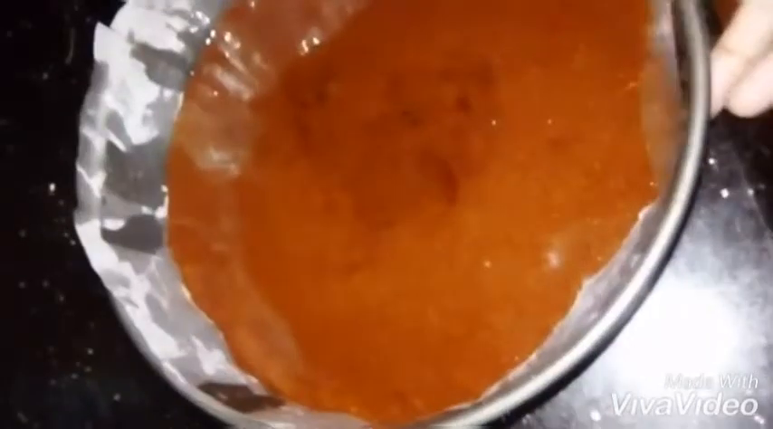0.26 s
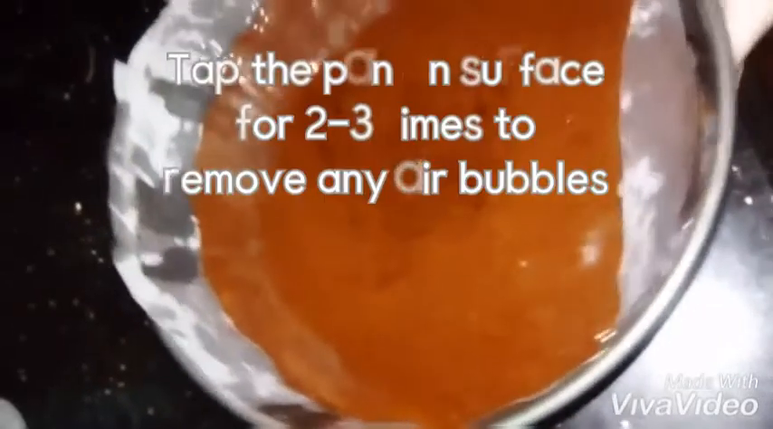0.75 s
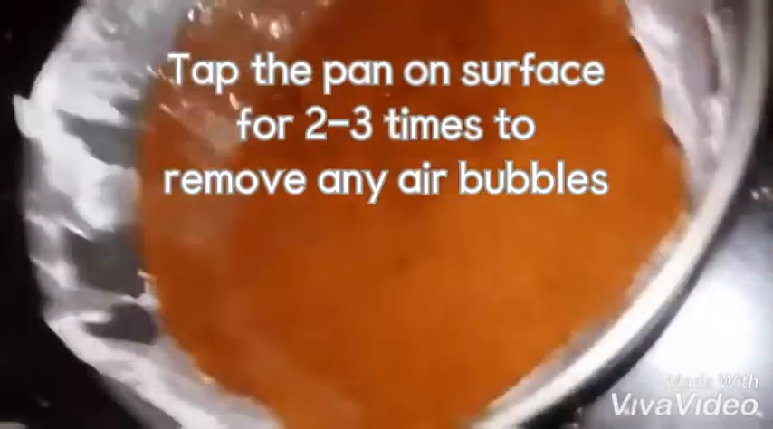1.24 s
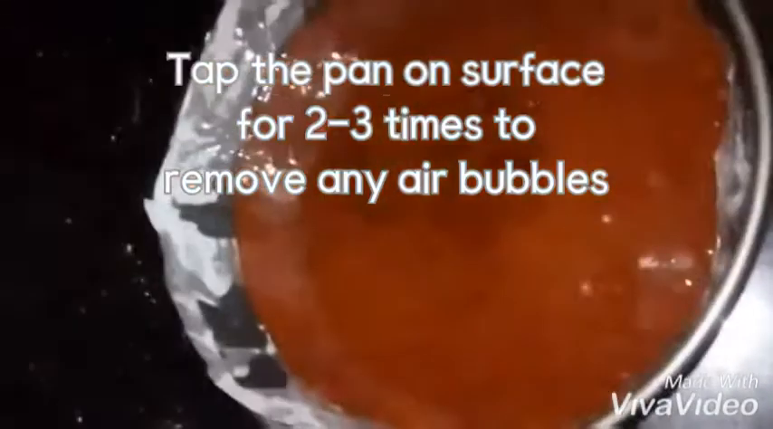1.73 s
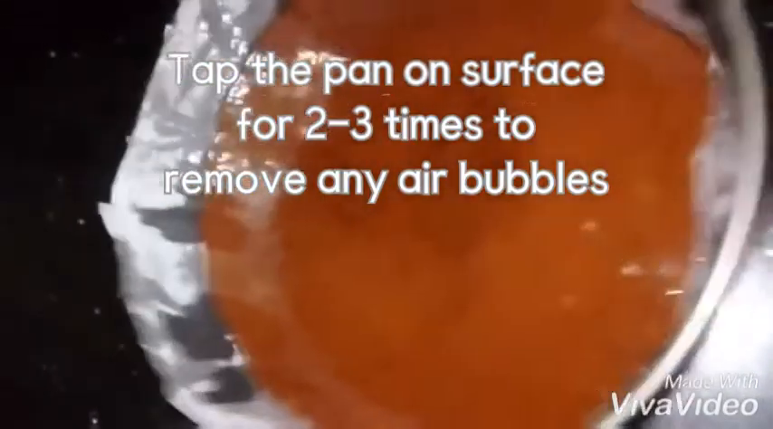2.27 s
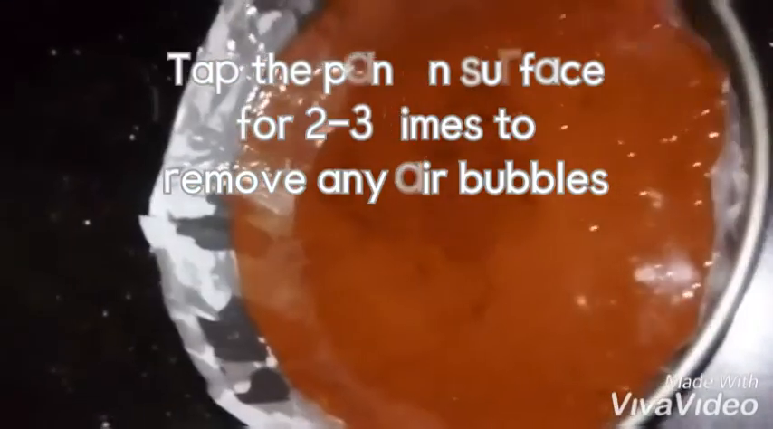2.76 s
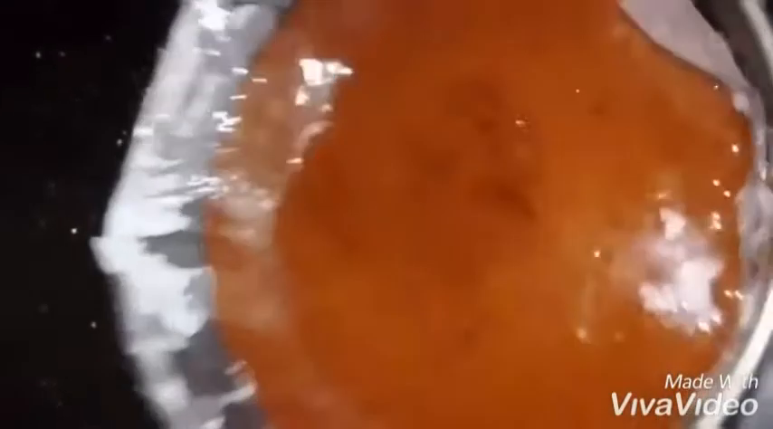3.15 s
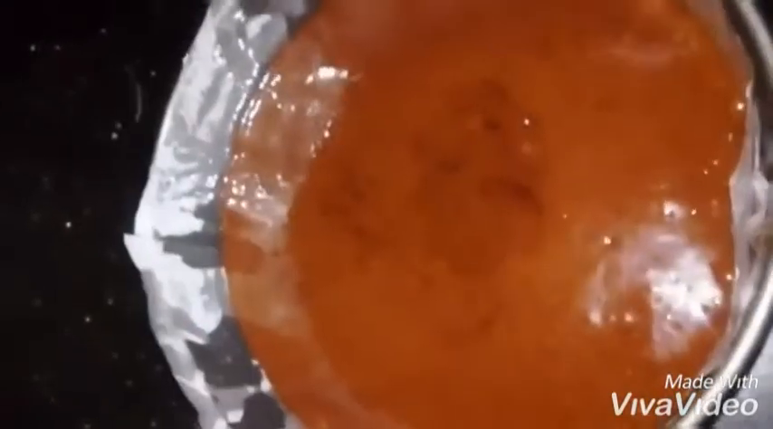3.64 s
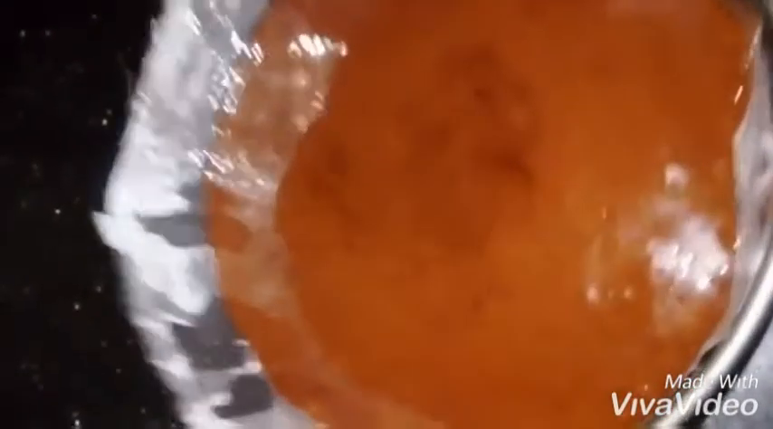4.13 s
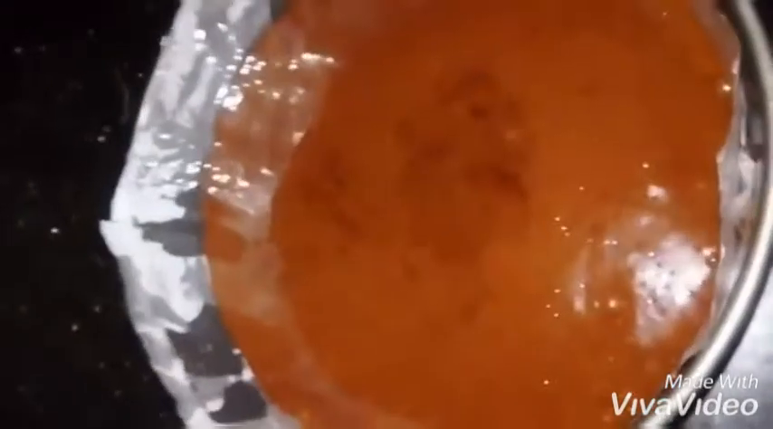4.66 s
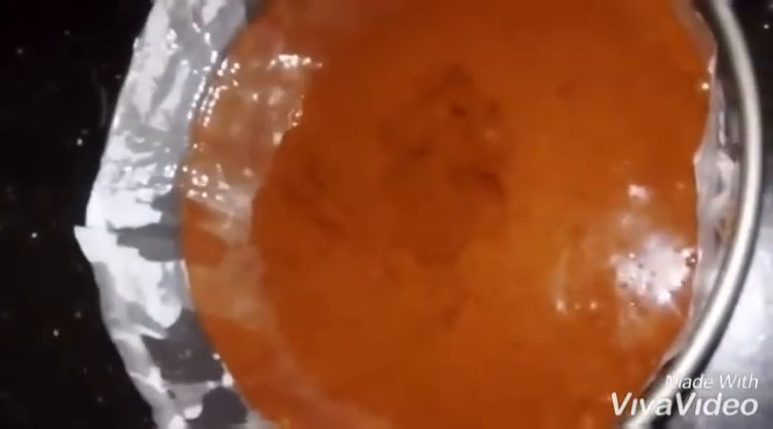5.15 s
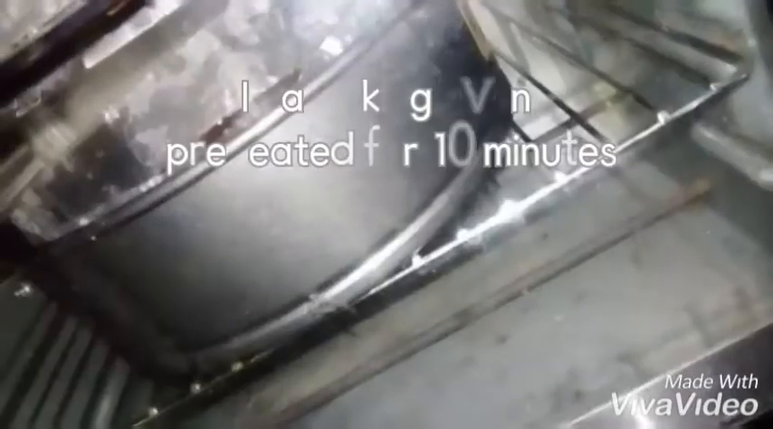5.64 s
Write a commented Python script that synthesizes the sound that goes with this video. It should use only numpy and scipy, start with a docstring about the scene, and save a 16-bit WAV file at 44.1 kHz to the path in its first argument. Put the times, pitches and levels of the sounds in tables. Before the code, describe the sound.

Close handheld stereo phone pickup in a reflective kitchen: dry paper snaps and rustles, then four loud, dull metallic knocks of a batter-heavy pan on a counter, the first a longer uneven clatter, the others tighter. More paper crackling falls between the first ones. A small clockwork timer ticks about four times a second over soft room noise and wavering hum, growing louder at the end.

```python
"""A paper-lined metal cake pan full of batter is knocked four times on a stone counter: decaying modes and rattling noise.
Each knock is a clattering cluster; the baking paper crackles in noise bursts and brief rings as the pan is lifted.
An oven's clockwork timer ticks, with a ringing case and a scrape, over a faint hum of sine tones and soft room noise.
The hard-walled kitchen adds a noise tail, and a phone's limiter ducks under every knock."""
import sys
import numpy as np
from scipy import signal
from scipy.fft import rfft, irfft, next_fast_len
from scipy.io import wavfile
from scipy.ndimage import uniform_filter1d

SR = 44100
rng = np.random.default_rng(int(sys.argv[2]) if len(sys.argv) > 2 else 0)


def wav_record(signal):
    """Record a signal, one row per channel, as 16-bit PCM in the file named by sys.argv[1]."""
    frames = np.transpose(np.atleast_2d(signal))
    bounded = np.clip(frames, -1, 1)
    # unit amplitude maps onto the largest positive 16-bit level
    quanta = np.round(bounded * 32767).astype(np.int16)
    wavfile.write(sys.argv[1], SR, quanta)


N = 259749
TIME = np.arange(N) / SR
ONE_SECOND = TIME[:SR]

# Levels are relative within each sound, unless marked rms. T60 is the time to fade by 60 dB.

# steady tones of the oven: f/Hz, rms level/dB before wavering
HUM_TONES = [(97, -76.5), (301, -78), (404, -81), (603, -88), (969, -87.5), (1437, -93)]
# a thin whine swells over the hum: t/s, rms level/dB before wavering
WHINE_LEVELS = [(0, -79), (1.0, -75.5), (4.9, -83.5), (5.12, -74.5), (5.35, -80.5), (5.65, -72),
                (5.89, -80)]
WHINE_HZ, HUM_WAVER_HZ = 869, 6
# colour of the room noise: f/Hz, level/dB
AIR_COLOUR = [(25, -7.5), (55, -19.5), (90, -1), (150, -9), (300, -5.5), (420, -5.5), (620, -13),
              (900, -12.5), (1300, -19), (4000, -22), (6500, -24), (8500, -33.5), (13500, -40.5),
              (15300, -41)]
AIR_RMS_DB = -65
# level of the room's hiss against its rumble: t/s, level/dB
HISS_LEVELS = [(0, 3), (1.2, .5), (2.1, -1), (5.3, 0), (5.55, -2.5)]
# the room's rumble swells and sinks
SWELL_HZ, SWELL_DB = 9, 1.5

# spells of steady ticking, the second one closer: first beat t/s, end t/s, first level/dB, last level/dB
TICK_SPELLS = [(0.2895, 5.3, -50.5, -47.5), (5.468, 5.89, -43, -40.5)]
# the escapement's unevenness, repeating every four beats: level/dB
BEAT_ACCENTS = [-2, 2, 2, 1]
BEAT_S = .23655
# modes of the timer's case: f/Hz, level/dB, T60/s
CASE_MODES = [(1440, -9, .06), (2050, -7, .07), (2450, -7, .06), (2950, -3, .06), (3440, 0, .055),
              (3700, -4, .05), (4010, 0, .045), (4250, -6, .05), (4740, -7, .045), (5170, -2, .05),
              (5950, -4, .05)]
# colour of the escapement's scrape: f/Hz, level/dB
SCRAPE_COLOUR = [(600, -31), (1600, -6.5), (3500, 0), (6300, -2), (7800, -22), (11500, -18.5), (16000, -17)]
SCRAPE_DB = -2  # against the ring of the case
# the loose escapement chatters within each beat
CHATTER_HZ, CHATTER_DB = 450, 5

# the paper slides against the pan: start t/s, length/s, level/dB
PAPER_SLIDES = [(0.292, .025, -61), (0.332, 0.046, -59), (0.339, 0.017, -48), (0.374, 0.0087, -51.5),
                (0.431, 0.0097, -48), (0.447, 0.026, -61), (0.506, 0.028, -56.5), (0.545, 0.193, -71.5),
                (0.758, 0.14, -59.5), (1.808, 0.16, -56.5), (1.988, 0.0057, -43.5), (2.292, 0.1, -63.5),
                (2.779, 0.039, -56.5), (2.827, 0.025, -51), (2.873, 0.056, -65.5), (3.786, 0.035, -60.5),
                (3.841, 0.024, -58), (3.897, 0.041, -64.5), (4.034, 0.035, -68.5), (4.339, 0.056, -46.5)]
RUSTLE_ATTACK_S, RUSTLE_RELEASE_S = 0.00424, 0.0051
GRAIN_DECAY_S, GRAIN_SCATTER_DB = 0.00039, 5.5  # ring and uneven loudness of the tiny crackles
SLIDE_DB = 0.5  # the sliding hiss against the crackles
# colour of the paper's noise: f/Hz, level/dB
PAPER_COLOUR = [(200, -25.5), (700, -10), (1200, -2.5), (1800, -1), (2700, 1.5), (5000, 1.5), (6800, 1),
                (8200, -8), (11000, -6), (13500, -15.5), (15300, 1), (16500, -17.5)]
PAPER_PAN_DB = -6  # left minus right

# the loudest creases of the paper snap: t/s, level/dB, ringing f/Hz, tilt of the crack from 2 to 12 kHz level/dB
CREASE_SNAPS = [(0.328, -33, 7540, 25), (0.349, -28, 6060, 16), (0.353, -28.5, 5100, 24),
                (0.359, -34, 5600, 17), (0.4323, -28.5, 3000, -2), (0.4357, -42, 4500, 2),
                (.444, -36, 4000, 15), (.463, -46, 4570, -5), (0.501, -35, 2730, 13), (.586, -43, 2880, -8),
                (.682, -37, 4500, -1), (0.777, -23, 3593, 0), (0.804, -36, 5960, -4.5),
                (0.8215, -29, 1700, -5), (.854, -33.5, 4677, -12), (.863, -23, 4810, -0.5),
                (0.879, -37, 6530, 9.5), (.959, -39.5, 12300, 4.5), (1.7969, -27.5, 2743, 27),
                (1.815, -32, 2677, 20), (1.8203, -34, 9150, 19), (1.832, -37.5, 6975, 5),
                (1.851, -33, 4950, 17), (1.86, -40.5, 6484, 14), (1.889, -24, 4915, 9),
                (1.924, -30.5, 5635, 12.5), (1.93, -39.5, 5500, 2), (1.9493, -34.5, 2603, 1.5),
                (1.992, -32, 4570, -2), (1.997, -28, 1071, -21), (2.011, -41.5, 5500, -4),
                (2.061, -42.5, 6320, 3.5), (2.316, -39, 2854, -4), (2.7612, -38.5, 6200, 11),
                (2.776, -27, 7000, 20), (2.8064, -30, 5430, 30), (2.857, -36, 5030, -5),
                (3.788, -38, 8200, 29), (3.842, -37.5, 5630, -27)]
# facets of a crease: their spread of pitch, their ring, their level against the crack
FACET_SPREAD_OCT, FACET_DECAY_S, FACET_DB = 0.31, 0.0024, 1.5
# a snapping crease sets off its neighbours: their mean delay, level and scatter
FOLLOW_S, FOLLOW_DB, FOLLOW_SCATTER_DB = .005, -17, 4

SQUEAK_S, SQUEAK_DB = 1.362, -63

# modes of the pan, most of them smothered by the batter: f/Hz, level/dB, T60/s before the grip changes it
PAN_MODES = [(243.2, -18, .13), (390, -23, .1), (445, -21.5, 0.13), (517.5, -22, 0.23), (510, -7.5, 0.048),
             (690, -18, .04), (742, -18.5, 0.2), (868, 2, 0.015), (870, -23, .13), (912, -17, .06),
             (1030, -14.5, .035), (1280, -9.5, .014), (1436, -20, .05), (1800, -8, .011), (2140, -20, .07),
             (2200, 2.5, 0.011), (2260, -26, .05), (2870, -10, .011), (3860, -12, 0.014),
             (6500, -9, 0.0035)]
# each knock meets the stone on another part of the base, which leaves one mode free; the grip sets the ring time:
# from t/s, free mode f/Hz, its lift level/dB, ring time as a multiple of the usual [ratio]
KNOCK_GRIPS = [(1.3, 937, 3, 1.1), (2.3, 860, 2.5, .9), (3.3, 520, 5, 1.6), (4.3, 450, 8, 1.1)]
FREE_WIDTH_OCT = .1
# each knock is a cluster of contacts, uneven in loudness, brightness and rattle:
# t/s, level/dB, brightness f/Hz, clank of the rim level/dB, rattle level/dB, rattle decay/s, left minus right level/dB
STONE_CONTACTS = [(1.3967, 7, 2000, -6, 0, .002, 0.5), (1.421, 1.5, 897, -4, 2, 0.019, -4),
                  (1.433, -1.5, 905, -6.5, 0.5, 0.015, -5.5), (1.49, -11, 699, -10, 9, 0.011, 2),
                  (1.5111, -3, 4513, 8, 5.5, 0.015, -3.5), (1.5173, 0, 3760, 2.5, 3, 0.0029, -3.5),
                  (1.5443, -4.5, 1518, -10.5, -0.5, 0.0088, 4), (1.56, -12, 2250, -2, 4, 0.005, -7),
                  (2.361, 14, 4514, 8.5, -1, 0.0012, -1.5), (2.381, 4.5, 3390, -4.5, 3, 0.0048, 2.5),
                  (2.3844, -3, 3000, 3, 9, 0.0025, -3), (2.3879, -1.5, 2557, 3.5, 5.5, 0.0022, -0.5),
                  (3.352, 10.5, 2013, -4, 0, 0.0052, -4.5), (3.3629, 4.5, 3090, 1, 6.5, 0.0045, -2.5),
                  (3.3691, 8, 2386, 4.5, -2.5, 0.005, -8), (4.3576, 6.5, 1700, 3.5, -1.5, 0.0019, -4),
                  (4.362, -1.5, 3556, -3.5, 12, 0.0048, -5.5), (4.3882, -5.5, 1900, 1, 1, 0.004, -0.5),
                  (4.405, -3.5, 3000, 0, 1.5, 0.0079, -7), (4.4223, -8, 1699, 8, -4, 0.0088, 10)]
# colour of the rattling rim: f/Hz, level/dB
RATTLE_COLOUR = [(100, -16), (250, 0.5), (340, -16), (490, 1), (630, -1.5), (900, 2.5), (1300, 2),
                 (1750, -7.5), (2250, 0), (2800, -7), (3600, -9.5), (4500, -10), (6800, -5.5), (8200, -13),
                 (13500, -19), (15200, -15)]
# the rim rattles in uneven spurts
SPURT_HZ, SPURT_DB = 900, 4
PAN_LOW_HZ = 334  # the pan radiates little below this
PAN_ROOM_DB = -8.5  # the pan's level sent to each wall
# the main blows also thump the counter under the pan's weight: t/s, level/dB
COUNTER_THUMPS = [(1.3973, -25), (1.511, -20), (2.3607, -21.5), (3.3523, -20.5), (4.3567, -14.5)]
# modes of the counter under the pan's weight: f/Hz, level/dB, T60/s
COUNTER_MODES = [(82.8, -25, 0.67), (121.7, -18, 0.21), (160, -3.5, 0.057), (220, -1, 0.048)]

# the kitchen's reverberation: f/Hz, level/dB, T60/s
KITCHEN_BANDS = [(80.54, -0.5, 0.41), (160, -12, 0.45), (247, -1, 0.66), (370, -3, .52),
                 (538.7, -4.5, 0.59), (850, -9, 0.55), (1140, -4.5, 0.48), (1600, -6, 0.53),
                 (2240, -8, 0.46), (2800, -4.5, 0.43), (4150, -4, 0.41), (7100, -7.5, 0.36),
                 (10100, -4.5, 0.2), (15210, -7, .28)]
# how alike the reverberation is at the phone's two ports: f/Hz, correlation [0 to 1]
PORT_LIKENESS = [(130, .93), (260, .66), (600, 0.44), (1500, 0.08), (5000, 0.024)]
# reflections from walls and cupboards arrive in clumps
CLUMP_HZ, CLUMP_DB = 160, 3.5
TOP_HZ = 16300  # the phone cuts off above this


def undb(db):
    """Decibels to gain."""
    return 10 ** (np.asarray(db) / 20)


def unit(x):
    """Scale to unit energy in each channel."""
    return x / np.sqrt(np.sum(x ** 2, axis=-1, keepdims=True))


def colour(x, points):
    """Filter by a (Hz, dB) spectrum; nothing sounds before its cause."""
    size = next_fast_len(x.shape[-1] + 4096, real=True) * 2
    octave = np.log2(np.maximum(np.fft.rfftfreq(size, 1 / SR), 1))
    hz, db = np.transpose(points)
    log_gain = np.log(undb(np.interp(octave, np.log2(hz), db)))
    # keeping one half of the cepstrum, doubled, gives the filter its minimum delay
    one_sided = np.r_[1, np.full(size // 2 - 1, 2)]
    cepstrum = irfft(log_gain)[:size // 2] * one_sided
    response = np.exp(rfft(cepstrum, size))
    return irfft(rfft(x, size) * response)[..., :x.shape[-1]]


def highpass(x, hz, order=2):
    """Small things radiate little bass."""
    return signal.sosfilt(signal.butter(order, hz, "high", fs=SR, output="sos"), x)


def walk(rate):
    """A random wander through `rate` new values a second, with a spread a little under 1."""
    steps = rng.standard_normal(400)
    return np.interp(TIME * rate, np.arange(len(steps)), steps)


def blend(mid, side, likeness):
    """Two independent signals become left and right channels that are partly alike."""
    shared = np.sqrt(1 + likeness) * mid
    opposed = np.sqrt(1 - likeness) * np.array([side, -side])
    return (shared + opposed) / np.sqrt(2)


def noise(size, likeness):
    """Stereo noise whose channels are partly alike."""
    mid, side = rng.standard_normal((2, size))
    return blend(mid, side, likeness)


def ring(modes, detune, scatter_db, lag_s):
    """Decaying modes, excited a little differently by each blow; each reaches the two ports with its own lag."""
    hz, db, t60 = np.transpose(modes)[..., None]
    pitch, size, direction = rng.standard_normal((3,) + hz.shape)
    hz = hz * (1 + detune * pitch)
    t = ONE_SECOND[:SR // 3]
    decay_rate = np.log(1000) / t60
    waves = undb(db + scatter_db * size) * np.exp((2j * np.pi * hz - decay_rate) * t)
    offset = np.pi * hz * lag_s * direction
    return np.array([np.sum(waves * np.exp(1j * side * offset), axis=0).imag for side in (1, -1)])


def add(out, s, sound, pan_db=0):
    """Mix a stereo sound in at time s."""
    start = max(int(s * SR), 0)
    part = sound[:, :N - start] * undb([[pan_db / 2], [-pan_db / 2]])
    out[:, start:start + part.shape[1]] += part


def hum_tone(hz, db):
    """A sine tone whose pitch and level both waver."""
    gain = undb(db + 3 * walk(8)) * np.sqrt(2)
    phase = 2 * np.pi * np.cumsum(hz + HUM_WAVER_HZ * walk(25)) / SR
    return gain * np.sin(phase)


def background():
    """The oven's wavering hum over soft room noise, which is most alike in both ears in the bass."""
    whine_db = np.interp(TIME, *np.transpose(WHINE_LEVELS))
    hum = sum(hum_tone(hz, db) for hz, db in [*HUM_TONES, (WHINE_HZ, whine_db)])
    low = signal.butter(2, 450, fs=SR)
    rumble = undb(SWELL_DB * walk(SWELL_HZ)) * signal.lfilter(*low, noise(N, likeness=.8))
    hiss_gain = undb(np.interp(TIME, *np.transpose(HISS_LEVELS)))
    hiss = hiss_gain * highpass(noise(N, likeness=0.15), hz=453)
    air = unit(colour(rumble + hiss, AIR_COLOUR))
    return hum + undb(AIR_RMS_DB) * np.sqrt(N) * air


def tick():
    """One beat: the escapement scrapes and drops, and the small case rings."""
    case = unit(ring(CASE_MODES, detune=.012, scatter_db=3, lag_s=.0001))
    t = ONE_SECOND[:case.shape[1]]
    chatter = undb(CHATTER_DB * walk(CHATTER_HZ)[:len(t)])
    rubbing = noise(len(t), likeness=0.56) * chatter * np.exp(-t / 0.014)
    scrape = unit(colour(rubbing, SCRAPE_COLOUR))
    onset = 1 - np.exp(-t / .0012)
    return 5.5 * (case + undb(SCRAPE_DB) * scrape) * onset


def timer():
    """The clockwork lets go once a beat, at evenly spaced times but with uneven loudness."""
    out = np.zeros((2, N))
    for first_s, end_s, first_db, last_db in TICK_SPELLS:
        beats = np.arange(first_s, end_s, BEAT_S)
        accents = np.resize(BEAT_ACCENTS, len(beats))
        levels = np.linspace(first_db, last_db, len(beats)) + accents
        for s, db in zip(beats, levels):
            add(out, s - .001, undb(db) * tick())  # starts early, as its onset is gradual
    return out


def facets(hz, spread_oct, decay_s, count):
    """Brief rings of small stiff patches of paper, scattered about a pitch: count x 2 x samples."""
    t = ONE_SECOND[:SR // 100]
    pitch, left, right = rng.standard_normal((count, 3)).T
    hz = np.minimum(hz * 2 ** (spread_oct * pitch), SR / 2)
    waves = np.sin(2 * np.pi * hz[:, None] * t) * np.exp(-t / decay_s)
    return np.transpose([left, right])[..., None] * waves[:, None]


def slide_envelope(s, length, db):
    """Loudness of one slide: a quick rise, a steady stretch, a quick fall."""
    rise = np.minimum(TIME - s, 0) / RUSTLE_ATTACK_S
    fall = np.maximum(TIME - s - length, 0) / RUSTLE_RELEASE_S
    return undb(db) * np.exp(rise - fall)


def rustles(count):
    """The sheet slides in an uneven swarm of tiny crackles, each at its own pitch, over a little hiss."""
    sliding = sum(slide_envelope(*slide) for slide in PAPER_SLIDES)
    swarm = np.zeros((2, N))
    grains = facets(hz=5540, spread_oct=0.72, decay_s=GRAIN_DECAY_S, count=count)
    for when, size, grain in zip(rng.random(count), rng.standard_normal(count), grains):
        add(swarm, when * TIME[-1], undb(GRAIN_SCATTER_DB * size) * grain)
    hiss = undb(SLIDE_DB) * unit(noise(N, likeness=0.12))
    crackle = highpass(colour(unit(swarm) + hiss, PAPER_COLOUR), hz=600)
    return sliding * np.sqrt(N) * unit(crackle) * undb([[PAPER_PAN_DB / 2], [-PAPER_PAN_DB / 2]])


def snaps():
    """A crease gives way with a dry crack, the facets around it ring for milliseconds, and smaller creases follow."""
    out, t = np.zeros((2, N)), ONE_SECOND[:SR // 100]
    burst = np.exp(-t / .0008) + .08 * np.exp(-t / .004)
    for s, db, hz, treble_db in CREASE_SNAPS:
        papery = colour(noise(len(t), likeness=0.16) * burst, PAPER_COLOUR)
        crack = colour(papery, [(2000, 0), (12000, treble_db)])
        patches = facets(hz, FACET_SPREAD_OCT, FACET_DECAY_S, count=6).sum(axis=0)
        snap = 1.6 * (unit(highpass(crack, hz=1400, order=3)) + undb(FACET_DB) * unit(patches))
        add(out, s, undb(db) * snap, PAPER_PAN_DB)
        for follower in facets(hz, FACET_SPREAD_OCT, FACET_DECAY_S, count=4):
            size_db = db + FOLLOW_DB + FOLLOW_SCATTER_DB * rng.standard_normal()
            small_snap = undb(size_db) * (unit(follower) + unit(crack))
            add(out, s + rng.exponential(FOLLOW_S), small_snap, PAPER_PAN_DB)
    return out


def squeak(s, hz, length_s, db):
    """A faint squeak as the fingers shift on the rim: a wavering sine that swells and fades."""
    phase = 2 * np.pi * np.cumsum(hz + 20 * walk(64)) / SR
    swell = np.exp(-.5 * ((TIME - s) / length_s) ** 2)
    return undb(db) * swell * np.sin(phase)


def held_modes(s):
    """The pan's modes as it is held during the knock under way at time s."""
    _, free_hz, lift_db, sustain = [knock for knock in KNOCK_GRIPS if knock[0] <= s][-1]
    hz, db, t60 = np.transpose(PAN_MODES)
    free = np.exp(-(np.log2(hz / free_hz) / FREE_WIDTH_OCT) ** 2)
    return np.transpose([hz, db + lift_db * free, t60 * sustain])


def strike(modes, bright_hz, clank_db, rattle_db, rattle_s):
    """One contact rings the pan and sets the rim rattling, with its own brightness and clank."""
    body = unit(ring(modes, detune=.004, scatter_db=1.2, lag_s=.00012))
    t = ONE_SECOND[:body.shape[1]]
    spurts = undb(SPURT_DB * walk(SPURT_HZ)[:len(t)]) * np.exp(-t / rattle_s)
    rattle = unit(colour(noise(len(t), likeness=.3) * spurts, RATTLE_COLOUR))
    blow = colour(body + undb(rattle_db) * rattle, [(1100, 0.0047), (2150, clank_db), (5000, 0)])
    contact = signal.butter(1, min(bright_hz, SR / 3), fs=SR)  # lowpass: a softer touch is duller
    return 3.35 * highpass(signal.lfilter(*contact, blow), hz=PAN_LOW_HZ, order=2)


def cake_pan():
    """Every contact with the stone rings the pan; the main blows also thump the counter under its weight."""
    out = np.zeros((2, N))
    for s, db, bright_hz, clank_db, rattle_db, rattle_s, pan_db in STONE_CONTACTS:
        hit = strike(held_modes(s), bright_hz, clank_db, rattle_db, rattle_s)
        add(out, s, undb(db) * hit, pan_db)
    for s, db in COUNTER_THUMPS:
        thump = ring(COUNTER_MODES, detune=0.03, scatter_db=2, lag_s=.0001)
        add(out, s, undb(db) * highpass(thump, hz=74.4, order=3))
    return out


def kitchen(x):
    """Tiled walls return a dense tail in which the top treble dies first; its bass is most alike at both ports."""
    hz, db, t60 = np.transpose(KITCHEN_BANDS)
    octave = np.log2(np.maximum(np.fft.rfftfreq(SR, 1 / SR), 1))
    alike_hz, alike = np.transpose(PORT_LIKENESS)
    likeness = np.interp(octave, np.log2(alike_hz), alike)
    mid, side = rfft(rng.standard_normal((2, SR)))
    field = blend(mid, side, likeness)
    clumps = undb(CLUMP_DB * walk(CLUMP_HZ)[:SR])
    build_up = 1 - np.exp(-ONE_SECOND / 0.008)
    tail = 0
    for band, band_db, band_t60 in zip(np.eye(len(hz)), db, t60):
        fall = np.exp(-np.log(1000) * ONE_SECOND / band_t60)
        decay = unit(clumps * fall * build_up)
        band_noise = irfft(field * np.interp(octave, np.log2(hz), band))
        tail = tail + undb(band_db) * decay * band_noise
    return signal.fftconvolve(x[None], tail, axes=1)[:, :N]


def scene():
    """Pan, paper and timer sound into one room; the pan radiates differently to each of the four walls."""
    pan = cake_pan() + squeak(SQUEAK_S, hz=3750, length_s=0.012, db=SQUEAK_DB)
    sheet, ticks = snaps() + rustles(count=8000), timer()
    near_walls = undb(PAN_ROOM_DB) * pan + undb(-10.0) * sheet + undb(-6) * ticks
    far_walls = undb(PAN_ROOM_DB) * cake_pan()  # same blows, freshly drawn ringing
    reverberation = sum(kitchen(x) for x in [*near_walls, *far_walls])
    return pan + sheet + ticks + reverberation + background()


def limiter(x, ceiling_db, ratio, recovery_db_per_s, ahead_s):
    """Turns down just before a loud sound and recovers steadily, which holds the room's tail level for a moment."""
    power = uniform_filter1d(np.mean(x ** 2, axis=0), SR // 125)
    level_db = 10 * np.log10(np.maximum(power, 1e-12))
    over_db = np.maximum(level_db - ceiling_db, 0) * (1 - 1 / ratio)
    # a running maximum against a rising ramp makes each cut recover at a steady rate
    ramp = recovery_db_per_s * TIME
    cut_db = np.maximum.accumulate(over_db + ramp) - ramp
    early_cut_db = np.interp(TIME + ahead_s, TIME, cut_db)
    return x * undb(-uniform_filter1d(early_cut_db, SR // 300))


def record(dry):
    """The sound fades in; the phone limits the knocks, clips any peak beyond full scale and cuts the top."""
    fade = np.clip((TIME - .07) / 0.25, 0, 1)
    limited = limiter(dry * fade, ceiling_db=-21.5, ratio=2.476, recovery_db_per_s=91.5, ahead_s=0.018)
    clipped = np.clip(limited, -1, 1)
    return signal.sosfilt(signal.ellip(8, .2, 70, TOP_HZ, fs=SR, output="sos"), clipped)


dry = scene()
out = record(dry)
wav_record(out)
```